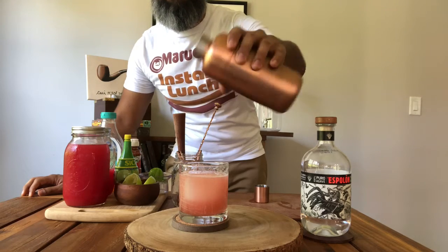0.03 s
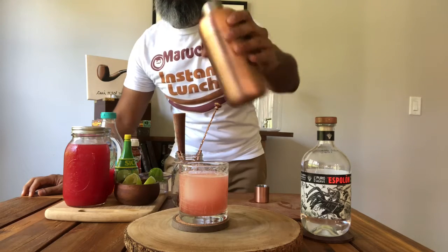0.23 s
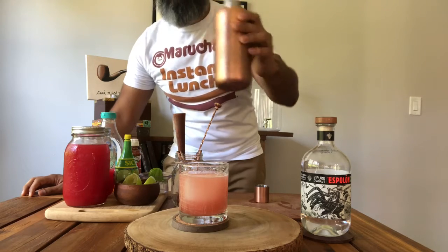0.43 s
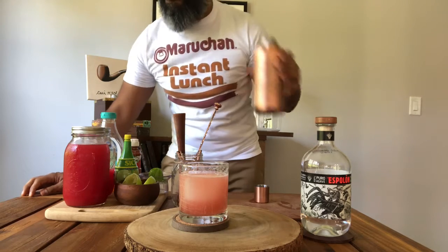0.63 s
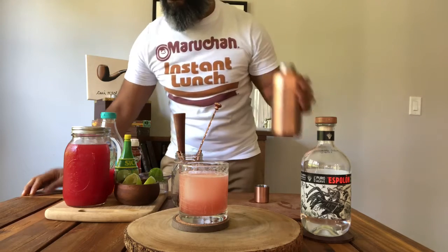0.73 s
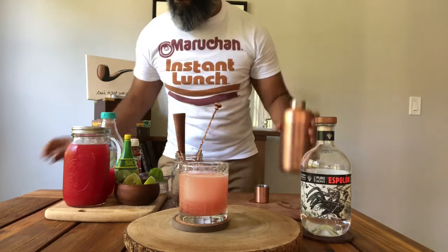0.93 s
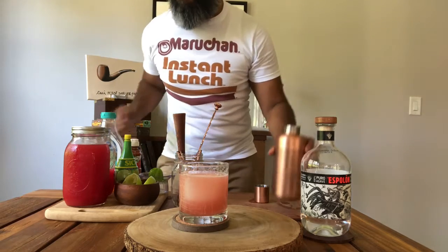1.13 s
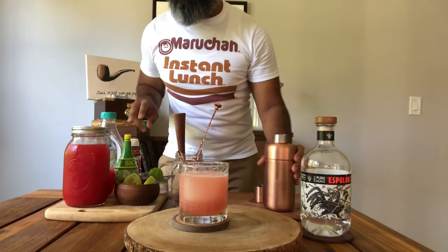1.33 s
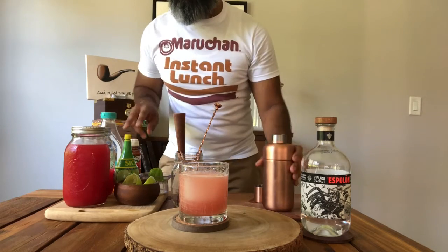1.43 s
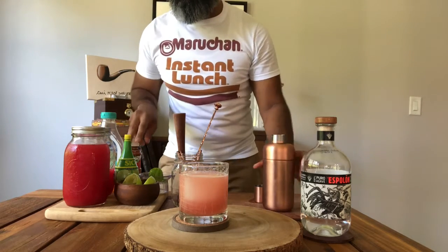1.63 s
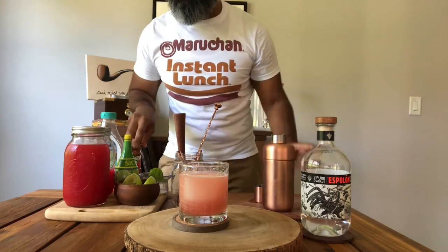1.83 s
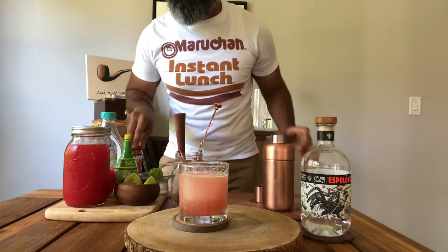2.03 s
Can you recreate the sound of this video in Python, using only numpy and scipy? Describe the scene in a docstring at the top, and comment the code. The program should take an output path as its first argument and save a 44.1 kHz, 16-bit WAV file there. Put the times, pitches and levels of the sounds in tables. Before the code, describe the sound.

A metal cocktail shaker with ice is handled in a bare, echoing room. A brief low hum opens, with faint ticks, then a bright ringing steel clink at 0.2 s and a sharp double clack at 0.4 s. A soft low bump comes near 0.95 s, a firm, woody table knock at 1.3 s, and a smaller settling tap at 1.5 s. Echo fades over quiet room air and faint mains hum.

```python
"""In a bare, echoing room, a metal cocktail shaker is turned upright: over a brief low hum left from
the shaking, the ice inside ticks, clinks against the steel wall and drops to the bottom with a clack.
Then the shaker is set down with a knock on a wooden table and settles on its base. Contacts are short
coloured noise bursts, steel, air and wood ring as fading tones, and fading noise makes the echo."""
import sys
import numpy as np
from scipy import signal
from scipy.fft import rfft, irfft
from scipy.io import wavfile
from scipy.ndimage import uniform_filter1d, map_coordinates

SR = 44100
rng = np.random.default_rng(int(sys.argv[2]) if len(sys.argv) > 2 else 0)


def log_audio(samples):
    """Write samples as a 16-bit WAV file to the path given in sys.argv[1]."""
    # one column per channel
    frames = np.atleast_2d(samples).T
    # limit to full scale, then quantise
    limited = np.clip(frames, -1, 1)
    pcm = np.round(limited * 32767).astype(np.int16)
    wavfile.write(sys.argv[1], SR, pcm)


N = 91728
T = np.arange(SR) / SR  # one second of time, for each single strike
PUSH_S = 0.0003  # time constant with which a contact reaches full force
STEEL_RISE_S, TABLE_RISE_S, CAVITY_RISE_S = 0.00052, 0.0046, 0.004  # time constants of the swelling


def amp(db):
    """Turns decibels into gain."""
    return 10 ** (np.asarray(db) / 20)


def read(points, hz):
    """Reads a table between its points, along a log-frequency axis."""
    f, value = np.transpose(points)
    return np.interp(np.log(hz + 1), np.log(f + 1), value)


def shape(points):
    """Makes a colour table into a function of frequency."""
    return lambda hz: read(points, hz)


def add(mix, s, sound):
    """Places a sound at a time in seconds, cut off at the end of the mix."""
    part = mix[round(s * SR):][:len(sound)]
    part += sound[:len(part)]


def colour(x, db_at, size=4096):
    """Filters with the gain db_at(Hz), never sounding before its input (minimum phase)."""
    hz = abs(np.fft.fftfreq(size, 1 / SR)) + 1
    log_gain = np.log(amp(db_at(hz)))
    spectrum = np.exp(np.conj(signal.hilbert(log_gain)))
    pulse = np.fft.ifft(spectrum).real
    return signal.fftconvolve(x, pulse[:size // 2])[:len(x)]


def tilt(x, db_per_octave):
    """Harder contacts are brighter: a slope around 2500 Hz, flat below 500 Hz."""
    return colour(x, lambda hz: db_per_octave * np.log2(np.maximum(hz, 500) / 2500))


def ring(modes, rise_s):
    """A struck object sounds many tones, each fading at its own rate after a short swell."""
    tones = np.zeros(len(T))
    for hz, db, t60 in modes:
        fade = np.exp(-np.log(1000) * T / t60)
        tones += amp(db) * fade * np.cos(2 * np.pi * hz * T)
    return tones * (1 - np.exp(-T / rise_s)) ** 2


def contact(db_at, rattle_s, scatter, rise_s):
    """A contact is a sharp push plus many dense, dying modes (noise), coloured by db_at(Hz)."""
    fade = np.exp(-np.log(1000) * T / rattle_s)
    burst = rng.standard_normal(len(T)) * fade * (1 - np.exp(-T / rise_s))
    burst *= np.sqrt(scatter) / np.linalg.norm(burst)
    burst[0] += np.sqrt(1 - scatter)  # the push holds the rest of the energy
    # even out the lumps in the burst's own spectrum before colouring it
    power = uniform_filter1d(abs(rfft(burst)) ** 2, size=100)
    lumps_db = 10 * np.log10(power + 1e-6)
    bins_hz = np.fft.rfftfreq(len(T), 1 / SR)
    return colour(burst, lambda hz: db_at(hz) - np.interp(hz, bins_hz, lumps_db))


# colour of the room's background before its overall level is set: (frequency [Hz], level [dB per Hz])
AIR_COLOUR = [(20, -39.5), (45, -10.5), (70, -4), (150, -4.5), (280, 0.5), (500, -12.5), (1100, -8.5),
              (2000, -23), (4000, -26.5), (7500, -30.5), (10000, -38.5), (16000, -43)]
AIR_DB, HUM_HZ, HUM_DB = -60.5, 58, -66


def background():
    """Quiet room air is coloured noise; a faint mains hum is one steady low tone."""
    gain = amp(read(AIR_COLOUR, np.fft.rfftfreq(N, 1 / SR)))
    air = irfft(rfft(rng.standard_normal(N)) * gain, N)
    hum = np.sin(2 * np.pi * HUM_HZ * np.arange(N) / SR)
    return amp(AIR_DB) * air / air.std() + amp(HUM_DB) * hum


# how long the echo lasts: (frequency [Hz], time to fade by 60 dB [s])
ECHO_T60 = [(80, 2.5), (250, 0.79), (700, 1.32), (1800, 1.2469), (4500, 1.0864), (8000, 0.775),
            (11000, 0.58), (15000, .46)]
# how strong the echo is: (frequency [Hz], level [dB])
ECHO_COLOUR = [(80, -4), (300, 0.44), (800, -0.36), (1800, -1.6), (4500, -0.39), (8000, 0), (15000, -9)]
ROOM_DELAY_S, ROOM_BUILD_S = 0.0024, 0.0073


def room(x, size=512):
    """Many blurred reflections: noise that builds quickly and fades at its own rate in each band."""
    hz, t, z = signal.stft(rng.choice([-1., 1.], N), SR, nperseg=size)
    rate = np.log(1000) / read(ECHO_T60, hz)[:, None]
    even_energy = np.sqrt(2 * rate / SR)  # long and short fades carry equal energy
    z = z * np.exp(-rate * t) * even_energy * amp(read(ECHO_COLOUR, hz))[:, None]
    echo = signal.istft(z, SR, nperseg=size)[1][:N]
    build = np.clip((np.arange(N) / SR - ROOM_DELAY_S) / ROOM_BUILD_S, 0, 1)
    return signal.fftconvolve(x, echo * build)[:N]


# first a brief low hum left from the shaking, then small handling taps:
# (time [s], level [dB], centre [Hz], distance from centre to -6 dB [octaves])
HUM_AND_TAPS = [(0.002, 3, 203.3, .22), (0.9545, -8.5, 635, 1), (0.957, -0.5, 263, 0.22),
                (1.52, -20, 13300, 0.27), (1.8595, -35, 12950, 0.37), (1.869, -40, 13200, 0.25)]
BURST_T60_S = 0.02  # time to fade by 60 dB, before the band filter


def hum_and_taps(floor_db=-50):
    """The brief low hum and the small taps are short noise bursts, each strongest in one band."""
    out = np.zeros(N)
    for s, db, centre_hz, octaves in HUM_AND_TAPS:
        band = lambda hz: np.maximum(-6 * (np.log2(hz / centre_hz) / octaves) ** 2, floor_db)
        add(out, s, amp(db) * contact(band, BURST_T60_S, 1, PUSH_S))
    return out


# the base meeting the table: (time [s], level [dB], brightness [dB per octave])
BASE_KNOCKS = [(1.2737, -39, -3), (1.2944, -2, 0), (1.2962, -8.5, -5), (1.3102, -20, 0), (1.5204, -17, 1)]
# colour of a knock: (frequency [Hz], level [dB])
KNOCK_TONE = [(30, -23), (70, -25), (140, -6.5), (300, 14.5), (800, 18), (1600, 25.5), (2700, 17.5),
              (3600, 15), (5000, 12.5), (7800, 1), (10000, -5.5), (15500, -17)]
# colour of the table's low boom: (frequency [Hz], level [dB])
BOOM_TONE = [(30, -3), (70, 11.5), (140, 18), (320, 29.5), (600, 15.5), (1200, 19), (2500, -8),
             (15000, -18)]
# short tones of the loaded base: (frequency [Hz], level [dB], time to fade by 60 dB [s])
BASE_MODES = [(1116, -14.5, 0.016), (1320, -25, 0.0083), (1630, -13.5, 0.026), (1701, -5, 0.02),
              (2160, -10.5, 0.034), (4540, -25, 0.048), (4930, -29.5, 0.0084), (7740, -39, 0.12)]
# tones of the table top: (frequency [Hz], level [dB], time to fade by 60 dB [s])
TABLE_MODES = [(118, -34.5, 0.45), (187, -34, 0.82), (274, -26.5, 0.86), (332.4, -31.5, 0.8),
               (458.3, -32.5, 0.45), (675.5, -37.5, 0.77), (779.5, -24, 0.37), (1220, -46, 0.37),
               (1381, -34, 1), (1527, -40, 0.12)]
KNOCK_RATTLE_S, BOOM_T60_S = 0.015, 0.32  # times to fade by 60 dB
KNOCK_SCATTER, BOOM_SCATTER = 0.897, 0.9  # noise's share of the energy
BOOM_DELAY_S = 0.003035


def table():
    """The base lands edge first, falls flat and rocks once more, making base and wood ring."""
    knock, clonk, boom, wood = np.zeros((4, N))
    for s, db, bright in BASE_KNOCKS:
        hit = contact(shape(KNOCK_TONE), KNOCK_RATTLE_S, KNOCK_SCATTER, PUSH_S)
        add(knock, s, amp(db) * tilt(hit, bright))
        swell = contact(shape(BOOM_TONE), BOOM_T60_S, BOOM_SCATTER, TABLE_RISE_S)
        add(boom, s + BOOM_DELAY_S, amp(db) * swell)
    # only the loudest knock makes the base and the table top ring
    landing_s = max(BASE_KNOCKS, key=lambda row: row[1])[0]
    add(clonk, landing_s, ring(BASE_MODES, STEEL_RISE_S))
    add(wood, landing_s, ring(TABLE_MODES, TABLE_RISE_S))
    return knock, clonk, boom, wood


SLOSH_SHARE, SLOSH_PER_S = 0.0022, 30  # typical (rms) share of pitch bend, fastest bends per second


def waver(tone, count=12):
    """The moving drink bends the ring's pitch at random: playback speeds up and slows down."""
    rates = SLOSH_PER_S * rng.uniform(0.18, 1, count)
    drift = sum(np.sin(2 * np.pi * (rate * T + rng.random())) for rate in rates)
    drift = drift * np.sqrt(2 / count)
    position = np.cumsum(1 + SLOSH_SHARE * drift) - 1
    return map_coordinates(tone, [position], order=5)


# tones of the steel shell, damped by the hand: (frequency [Hz], level [dB], time to fade by 60 dB [s])
SHELL_MODES = [(1096.5, -41.5, 0.49), (1222, -43.5, 0.49), (2361, -21.5, 0.21), (2386, -7, .06),
               (2393, -23, 0.54), (3210, -34.5, 0.17), (3874, -28.5, 0.13), (3860, -29, 0.57),
               (4180, -35.5, .06), (5192, -24.5, .04), (6060, -27.5, .1), (7670, -30.5, 0.039),
               (8712, -35.5, .15), (9050, -22, 0.069), (9000, -31, 0.15), (9190, -41.5, 0.59),
               (11120, -25, 0.11), (12760, -33, 0.071), (15400, -37.5, .025)]
TWIN_SPREAD = 0.005  # typical detuning, as a share of the pitch
TWIN_DB, TWIN_ABOVE_HZ = -11, 3000  # each twin's level beside its main tone; only tones above this split


def steel(count=3):
    """The shell is not quite round, so its upper tones have slightly detuned twins; all waver."""
    detune = 1 + TWIN_SPREAD * rng.standard_normal((len(SHELL_MODES), count))
    twins = []
    for (hz, db, t60), row in zip(SHELL_MODES, detune):
        if hz > TWIN_ABOVE_HZ:
            twins += [(hz * d, db + TWIN_DB, t60) for d in row]
    return waver(ring(SHELL_MODES + twins, STEEL_RISE_S))


# ice striking the shaker wall: (time [s], ring level [dB], contact click level [dB])
WALL_CLINKS = [(0.1915, -1.5, -1), (0.2284, -10, -2)]
# ice landing and ticking inside the shaker: (time [s], level [dB], brightness [dB per octave])
ICE_CLACKS = [(0.0208, -24, -5.5), (0.0393, -35, -2), (0.0832, -20.5, -2.5), (0.1055, -53, 1),
              (0.131, -33, -4), (0.141, -24.5, -5), (0.164, -24.5, -3.5), (0.1865, -22, -0.5),
              (0.4078, -3, 0.5), (0.4104, -6, -2), (0.4269, -22.5, -6.5), (0.457, -26, -6),
              (0.4921, -20, -7), (0.512, -23.5, -6.5)]
# colour of a clink's click: (frequency [Hz], level [dB])
CLINK_TONE = [(60, -30), (300, -1.5), (800, -3), (1400, 3), (2000, 17), (3000, 8.5), (4800, 12.5),
              (5600, 4), (9000, 5), (13000, -2), (16000, 1)]
# colour of a clack: (frequency [Hz], level [dB])
CLACK_TONE = [(60, -21.5), (300, 1), (700, -4), (1200, 10), (2100, 12.5), (3500, 11), (5000, 7.5),
              (6200, -0.5), (8000, -4.5), (9100, 0.5), (10500, -7.5), (15500, -4.5)]
# tone of the air inside the shaker: (frequency [Hz], level [dB], time to fade by 60 dB [s])
CAVITY_MODES = [(252.6, -38, 0.48)]
CLINK_RATTLE_S, CLACK_RATTLE_S = 0.02, 0.017  # times to fade by 60 dB
CLINK_SCATTER, CLACK_SCATTER = 1, 0.8  # noise's share of the energy
CLACK_SHELL_DB, CLACK_CAVITY_DB = -28, -6  # how strongly a clack rings the shell and the air inside
CAVITY_FOLLOW = 0.43  # dB of hollow ring per dB of clack


def shaker():
    """Ice rings the steel wall and clacks on the bottom; the air inside adds a hollow ring."""
    out, hollow = np.zeros((2, N))
    shell, cavity = steel(), ring(CAVITY_MODES, CAVITY_RISE_S)
    for s, ring_db, click_db in WALL_CLINKS:
        click = contact(shape(CLINK_TONE), CLINK_RATTLE_S, CLINK_SCATTER, PUSH_S)
        add(out, s, amp(ring_db) * shell + amp(click_db) * click)
        add(hollow, s, amp(ring_db) * cavity)
    for s, db, bright in ICE_CLACKS:
        hit = contact(shape(CLACK_TONE), CLACK_RATTLE_S, CLACK_SCATTER, PUSH_S)
        clack = hit + amp(CLACK_SHELL_DB) * shell
        add(out, s, amp(db) * tilt(clack, bright))
        add(hollow, s, amp(CLACK_CAVITY_DB + CAVITY_FOLLOW * db) * cavity)
    return out, hollow


def scene():
    """Each source is heard directly and through the room, over the background."""
    ice, hollow = shaker()
    knock, clonk, boom, wood = table()
    hollow = amp(4) * hollow
    # (sound, level sent into the room [dB])
    layers = [(ice, -3.5), (hollow, -12), (hum_and_taps(), -8),
              (knock, 1), (clonk, -13), (boom, -4.5), (wood, -9.5)]
    direct = sum(sound for sound, _ in layers)
    echo = room(sum(amp(db) * sound for sound, db in layers))
    return (direct + echo + background())[None]


def record(dry, low_cut_hz=36, edge_hz=16000):
    """The microphone drops deep bass, rounds off peaks near full scale and cuts the top treble."""
    high_pass = signal.butter(3, low_cut_hz, "high", fs=SR, output="sos")
    thin = signal.sosfilt(high_pass, dry)
    rounded = thin / (1 + thin ** 8) ** (1 / 8)
    low_pass = signal.firwin(201, edge_hz, window=("kaiser", 8), fs=SR)
    return signal.oaconvolve(rounded, low_pass[None], "same")


dry = scene()
out = record(dry)
log_audio(out)
```